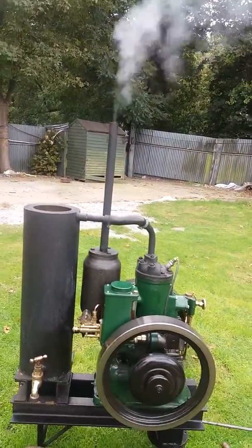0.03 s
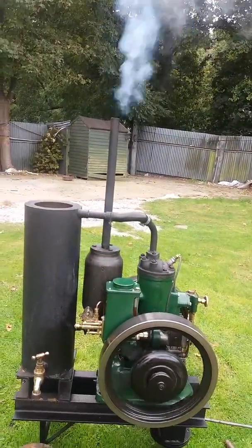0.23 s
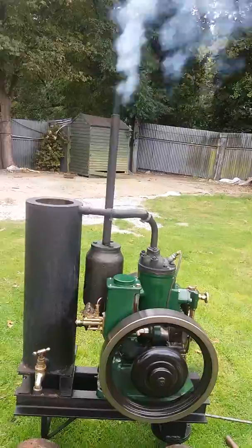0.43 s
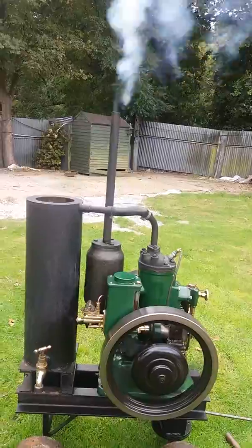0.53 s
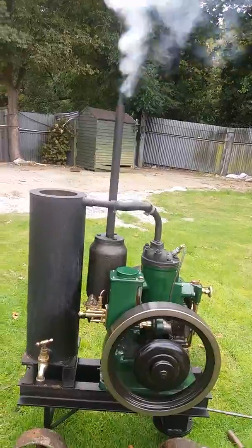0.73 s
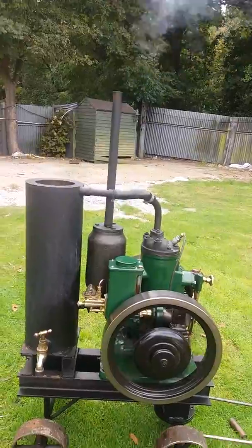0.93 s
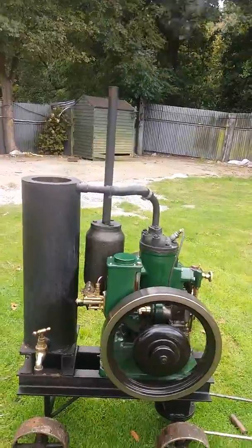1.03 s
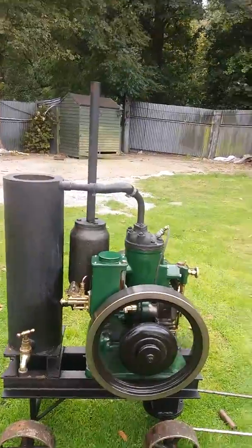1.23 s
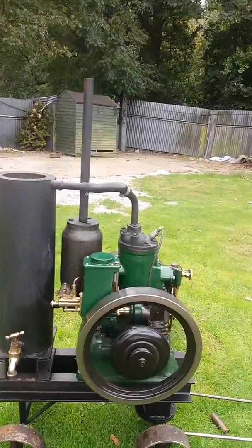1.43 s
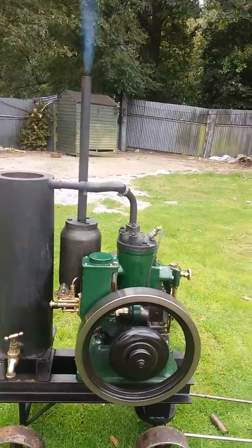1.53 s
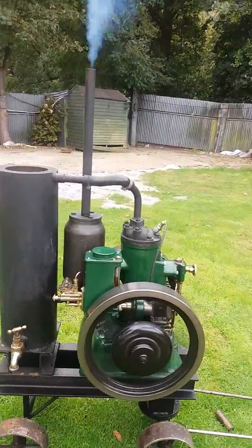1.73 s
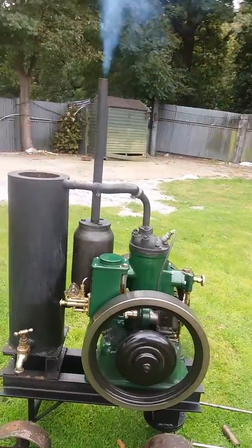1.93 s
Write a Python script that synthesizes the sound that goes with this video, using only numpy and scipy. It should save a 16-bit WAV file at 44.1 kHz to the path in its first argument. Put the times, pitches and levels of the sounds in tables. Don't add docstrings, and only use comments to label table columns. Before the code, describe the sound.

A small vintage stationary engine runs a few metres away outdoors, popping ten times a second with sucking hiss and loose metallic rattle. Exhaust thumps with hissing, whistling puffs come near 0.27 and 0.37 s, then mostly pops and clatter. At 1.0 s a backfire roars and cracks, clipping and fading by 1.2. The phone's level drops; quieter running continues, with firm puffs at 1.2, 1.4 and 1.7-1.9, short diffuse echo, faint low whirr.

```python
import sys
import numpy as np
from scipy import signal
from scipy.fft import rfft, irfft
from scipy.io import wavfile
from scipy.ndimage import uniform_filter1d

SR = 44100
rng = np.random.default_rng(int(sys.argv[2]) if len(sys.argv) > 2 else 0)


def int16_out(signal):
    q = np.round(np.clip(np.atleast_2d(signal).T, -1, 1) * 32767)
    wavfile.write(sys.argv[1], SR, q.astype(np.int16))


def ratio(d):
    e = np.asarray(d, float) / 20
    return 10 ** e


N = 88200
T = np.arange(N) / SR


def unit(x):
    return x / np.sqrt(np.mean(x ** 2))


def coloured(table):
    table_hz, table_db = np.array(table, float).T
    hz = np.arange(1, N // 2 + 2) * SR / N
    db = np.interp(np.log(hz), np.log(table_hz), table_db)
    return unit(irfft(rfft(rng.standard_normal(N)) * ratio(db), N))


def band(x, hz, width_hz):
    return signal.lfilter(*signal.iirpeak(hz, hz / width_hz, fs=SR), x)


def steep_band(x, hz, width_hz):
    return band(band(x, hz, width_hz), hz, width_hz)


def resonant(peaks):
    noise = rng.standard_normal(N)
    return unit(sum(ratio(db) * unit(steep_band(noise, hz, 1.2 * width)) for hz, width, db in peaks))


def clicks(times, dbs):
    x = np.zeros(N)
    where = np.clip((np.asarray(times) * SR).astype(int), 0, N - 1)
    np.add.at(x, where, ratio(np.asarray(dbs)))
    return x


def bursts(times, dbs, rise, hold, t60):
    t = T[:SR // 3]
    shape = np.minimum(t / max(rise, 1e-4), 1) * ratio(-60 * np.maximum(t - rise - hold, 0) / t60)
    power = signal.fftconvolve(clicks(times, dbs) ** 2, shape ** 2)[:N]
    return np.sqrt(np.abs(power))


def flicker(rate_hz, db):
    k = int(SR / rate_hz)
    steps = np.repeat(rng.standard_normal(N // k + 1), k)
    return ratio(db * unit(uniform_filter1d(steps, k)[:N]))


def dip(width_s, rebound):
    wide = np.hanning(int(2.59 * width_s * SR))
    core = np.clip(1 - np.linspace(-2.5, 2.5, len(wide)) ** 2, 0, 1) ** 2
    return core - rebound * wide * core.sum() / wide.sum()


def whistle(hz, width_hz):
    waver = unit(uniform_filter1d(rng.standard_normal(N), SR // 400))
    phase = 2 * np.pi * np.cumsum(hz + width_hz * waver) / SR
    return np.sqrt(2) * flicker(350, 1.55) * np.sin(phase)


# (intake pop t/s, pop level/dB, suction hiss level/dB)
TURNS = [(0.0193, -14, -35), (0.1205, -15, -34.5), (0.2221, -10.5, -35.5), (0.3228, -13.5, -27.5),
         (0.422, -11.5, -29.5), (0.522, -10.5, -29), (0.6229, -13.5, -30.5), (0.7241, -11.5, -30.5),
         (0.8259, -10.5, -30), (0.929, -9, -30.5), (1.0365, -8.0, -7.5), (1.1417, -10, -27),
         (1.2391, -7.5, -26.5), (1.3426, -8.5, -28), (1.4508, -18, -38), (1.5505, -12.5, -33.5),
         (1.6551, -12.5, -33.5), (1.7636, -10.5, -30), (1.8622, -9.5, -32.5), (1.962, -12.5, -31.5)]
# (offset t/s, level/dB, width t/s,
# signed size)
POPS = [
    (0, 2.5, 0.0012, -0.87),
    (.0245, -5.5, 0.0022, 0.66),
    (.0283, -6, 0.0011, -1),
    (.032, 1.5, 0.0044, 0.3),
    (.0555, -10.5, 0.0034, 1),
    (.004, -14, 0.0048, 1),
    (.078, -16, 0.0073, 0.8),
]
# (t/s, level/dB)
VALVE_LIFTS = [(0.0122, -16), (0.1134, -16.5), (0.2147, -17.5), (0.316, -15), (0.4145, -17), (0.514, -16),
               (0.6149, -13.5), (0.7166, -13.5), (0.8182, -14.9), (0.9209, -14), (1.1313, -11),
               (1.2304, -13), (1.334, -13.5), (1.5415, -15), (1.6464, -15.5), (1.7542, -14),
               (1.8534, -14.4), (1.9533, -14)]
# (f/Hz, level/dB)
SUCTION_COLOUR = [(1500, -3), (3000, 1.5), (5500, -1.5), (8000, -5), (12000, -14), (16000, -17)]


def intake():
    t, pop_db, hiss_db = np.array(TURNS).T
    pops = 0
    for offset, gain_db, width, sign in POPS:
        scatter_db = 1.2 * rng.standard_normal(len(t))
        hits = clicks(t + offset, pop_db + gain_db + scatter_db)
        pops = pops + sign * np.convolve(hits, dip(width, 0.83), "same")
    pops = 0.92 * pops + 0.51 * band(pops, 790, 1560)
    lift_s, lift_db = np.array(VALVE_LIFTS).T
    lifts = np.convolve(clicks(lift_s, lift_db + 3), dip(0.0014, 0.6), "same")
    suction = bursts(t - 0.007, hiss_db + 1, rise=0.006, hold=0.0067, t60=0.12)
    return pops - lifts + suction * flicker(300, 2.66) * coloured(SUCTION_COLOUR)


# (f/Hz, level/dB, t60 t/s, delay t/s)
PIPE = [
    (160, 8.5, 0.022, 0.0026),
    (60.3, -8, 0.14, 0.0109),
]


def thump(times, dbs):
    t = T[:SR // 4]
    body = 0
    for hz, db, t60, delay in PIPE:
        since = np.maximum(t - delay, 0)
        body = body + ratio(db - 60 * since / t60) * np.sin(2 * np.pi * hz * since)
    body = np.convolve(body, np.hanning(int(0.0033 * SR)))
    body = body / np.abs(body).max()
    port = np.hanning(int(0.0024 * SR))
    port = np.pad(port, (0, len(body) - len(port)))
    return signal.fftconvolve(clicks(times, dbs), body - ratio(-8.5) * port)[:N]


def gas_puffs(times, first_db, second_db):
    first = bursts(times + 0.001, first_db, rise=0.0031, hold=0.0071, t60=0.042)
    second = bursts(times + 0.022, second_db, rise=0.0068, hold=0.0077, t60=0.07)
    return first + second


# (t/s, thump level/dB, gas level/dB, jet centre f/Hz, second puff level/dB)
FIRINGS = [
    (0.267, -13, -14.5, 4940, -25.5),
    (0.369, -12.5, -15, 5200, -28.5),
    (.980, -25, -19, 5160, -17),
    (1.186, -12.5, -17, 5400, -30),
    (1.393, -9, -10, 5800, -43),
    (1.413, -11.5, -16.5, 5300, -40),
    (1.499, -22, -37, 5400, -45),
    (1.706, -8, -10.5, 5600, -27.5),
    (1.809, -13.5, -18, 5300, -31),
    (1.91, -11, -18, 5750, -34),
]
# (f/Hz, level/dB)
GAS_COLOUR = [(400, -3), (1500, -3.5), (2300, -3.5), (3300, -5), (4500, -3), (7000, -4.5), (10400, -16.5),
              (16000, -26.5)]
# (t/s, f/Hz, level/dB, width/Hz)
SHEEN = [(0.27, 10470, -23, 1600), (.271, 6230, -23, 400), (0.371, 11100, -33, 2000),
         (.519, 4770, -28.5, 249.8), (0.583, 5470, -30, 200), (.684, 5430, -27.5, 200),
         (.785, 5400, -32, 200), (1.302, 5330, -28, 300), (1.187, 6280, -26.5, 500),
         (1.395, 6700, -22, 598.5), (1.705, 6800, -19.5, 500), (1.815, 5400, -19, 500),
         (1.912, 5480, -20, 500)]
# (t/s, f/Hz, level/dB, width/Hz, hold t/s)
WHISTLES = [(.266, 760, -24, 60.1, 0.0032), (0.269, 1950, -36, 40.6, 0.0077),
            (0.285, 1860, -27.5, 25, 0.018), (0.312, 1850, -38, 25, .02), (0.371, 1090, -21.5, 55, 0.006),
            (.376, 1840, -31, 40.4, 0.0041), (0.392, 1060, -28.5, 59, 0.011),
            (0.386, 1880, -30.5, 30, 0.01), (0.98, 850, -28.5, 79.3, 0.0048),
            (1.029, 310, -13.5, 71, 0.0091), (1.02, 1260, -15, 83.5, 0.0062),
            (1.064, 720, -21.5, 61, 0.017), (1.184, 1280, -17.5, 58.8, 0.0033),
            (1.193, 1450, -18, 60.4, 0.0062), (1.19, 2450, -20.5, 147.5, 0.0054),
            (1.206, 1164, -21.5, 81, 0.01), (1.394, 2450, -18.5, 198.7, 0.0092),
            (1.39, 1080, -20.5, 60, .009), (1.411, 1220, -21, 99.5, 0.011),
            (1.706, 1070, -17, 25.2, 0.0069), (1.734, 1050, -26.5, 30, 0.0038),
            (1.807, 1080, -20, 39.3, 0.0064), (1.826, 1040, -32, 30, 0.013),
            (1.908, 1130, -16.5, 30, 0.0037), (1.911, 2270, -25.5, 49.6, 0.0096),
            (1.929, 1050, -30, 40.5, .012), (1.933, 1910, -28, 45, 0.01)]


def exhaust():
    t, thump_db, gas_db, jet_hz, second_db = np.array(FIRINGS).T
    out = thump(t, thump_db)
    rough = flicker(500, 1.6)
    out = out + ratio(-3.0) * gas_puffs(t, gas_db, second_db) * rough * coloured(GAS_COLOUR)
    for k, hz in enumerate(jet_hz):
        one = slice(k, k + 1)
        puffs = gas_puffs(t[one], gas_db[one], second_db[one])
        out = out + ratio(-3.0) * puffs * rough * resonant([(hz, 1040, 0)])
    for s, hz, db, width in SHEEN:
        edge = bursts([s], [db], rise=0.002, hold=0.0065, t60=0.04)
        out = out + edge * resonant([(hz, width, 0)])
    for s, hz, db, width, hold in WHISTLES:
        out = out + bursts([s], [db], 0.003, hold, t60=0.041) * whistle(hz, width)
    return out


# (t/s, level/dB)
FLAME = [
    (.995, -35),
    (.996, -12),
    (1.008, -7),
    (1.015, -7),
    (1.019, -6.5),
    (1.045, -10.5),
    (1.09, -8),
    (1.13, -17),
    (1.19, -29.5),
]
# (f/Hz, level/dB)
FLAME_COLOUR = [(100, -4.5), (400, -5.5), (700, -11.5), (1150, -6.5), (3000, -3.5), (5770, 0.5),
                (9000, -13), (16000, -32)]
# (f/Hz, level/dB)
CRACK_COLOUR = [(180, -23), (650, 0), (2500, -6.5), (5000, -0.5), (16000, -13)]
# (f/Hz, level/dB, t60 t/s)
SHELL = [
    (171, -4.5, 0.038),
    (630, 0.5, 0.023),
    (1764, -4, 0.023),
]


def backfire():
    flame_s, flame_db = np.array(FLAME).T
    burning = (T > flame_s[0]) * (T < flame_s[-1])
    roar = ratio(np.interp(T, flame_s, flame_db)) * burning * flicker(300, 2.1) * coloured(FLAME_COLOUR)
    crack = bursts([1.008], [-6.5], rise=0.0029, hold=0.0024, t60=0.035) * coloured(CRACK_COLOUR)
    t = np.maximum(T - 1.0085, 0)
    shell = sum(ratio(db - 60 * t / t60) * np.sin(2 * np.pi * hz * t) for hz, db, t60 in SHELL)
    return roar + crack + shell * np.minimum(t / 0.0021, 1)


# (t/s, level/dB, share of the low casting ring level/dB)
RATTLES = [(0, -24, -8),
           (0.025, -24.5, -5), (0.044, -39, -4), (0.062, -24.5, -3), (0.069, -29, -6),
                 (0.077, -33.5, -11), (0.099, -53, 5), (0.125, -24.5, -5.5), (0.147, -30, -11),
                 (0.166, -24.5, -2), (0.187, -23.5, -4), (0.191, -29.5, -2), (0.199, -30, 1),
                 (0.209, -45, 14), (0.226, -26, -20), (0.246, -26, -10.5), (0.299, -32, 1),
                 (0.33, -36, -10), (0.35, -27.5, -8), (0.403, -35, 10), (0.43, -28.5, -7),
                 (0.451, -24.5, -15), (0.47, -25.5, -8), (0.489, -27, -1), (0.503, -28.5, 3),
                 (0.522, -35, 7), (0.549, -27, -2), (0.574, -26.5, -7), (0.584, -23.5, -8),
           (0.621, -34, 2), (0.634, -25, -9), (0.653, -37, 0), (0.672, -25.5, 1), (0.679, -28, -2),
                  (0.685, -24, -17), (0.732, -27, -22), (0.753, -30.5, -2), (0.771, -33, -1),
                  (0.781, -31, -5), (0.787, -24.5, -4), (0.824, -35, -9), (0.832, -28.5, -3),
                  (0.839, -33, 2), (0.857, -28, 2.5), (0.878, -23.5, -9), (0.895, -26.5, -3.5),
                  (0.926, -30, 2), (0.937, -26.5, -10), (0.956, -34, -5), (1.237, -30, 3),
                  (1.269, -25.5, 3.5), (1.289, -26.5, 2.5), (1.297, -27, 3),
           (1.305, -24.5, -4), (1.324, -30.5, 3), (1.346, -22.5, -6), (1.374, -28, -2),
                (1.454, -30, -9), (1.495, -26, -8), (1.513, -30, -10), (1.556, -25, -5), (1.584, -27, -9),
                (1.603, -26, -14), (1.623, -28, -8), (1.635, -27, -7), (1.667, -24.5, -12),
                (1.688, -49, -16), (1.736, -23.5, -13), (1.764, -31, -5), (1.789, -24.5, -7),
                (1.846, -31, 3), (1.862, -27.5, 1), (1.891, -29, -3), (1.968, -28, -20), (1.99, -27, -2)]
# (f/Hz, width/Hz, level/dB)
CASTING_LOW = [(1122, 114, 0.5), (1320, 180, -3)]
# (f/Hz, width/Hz, level/dB)
CASTING_HIGH = [(2525, 710, -7), (2994, 840, -2.5), (4330, 3550, -12), (5300, 820, -1), (5800, 1140, -10.5)]


def linkage():
    t, db, low_db = np.array(RATTLES).T
    chatter = bursts(t, db, rise=0.0002, hold=0.0045, t60=0.018)
    chatter = chatter * flicker(900, 2.65) * rng.standard_normal(N)
    struck = chatter + 6 * clicks(t + 0.0005, db + 4)
    high = 0
    for k, (hz, width, gain_db) in enumerate(CASTING_HIGH):
        ring = steep_band(struck, hz, 1.31 * width) * np.sqrt(SR / width / 6)
        high = high + (-1) ** k * ratio(gain_db) * ring
    low = bursts(t, db + low_db - 1.5, rise=0.0015, hold=0.0015, t60=0.07) * resonant(CASTING_LOW)
    return high + low


def fence_echo(engine):
    t = T[:SR // 2]
    tail = rng.standard_normal(len(t)) * ratio(-60 * t / 0.3) * np.minimum(t / 0.006, 1)
    reply = band(tail, 2660, 5600) / np.sqrt(np.sum(tail ** 2))
    return ratio(-11.5) * signal.fftconvolve(engine, reply)[:N]


# (f/Hz, level/dB)
GARDEN_COLOUR = [(24, -39), (40, 2), (130, -2), (918, -4.5), (1090, 1), (1900, -8.5), (5580, -19),
                 (7540, -30), (16000, -50)]


def garden():
    return ratio(-32.5) * flicker(60, 1.5) * coloured(GARDEN_COLOUR)


def scene():
    engine = intake() + exhaust() + backfire() + linkage()
    heard = engine + fence_echo(engine) + garden()
    heard = heard - 0.43 * band(heard, 250, 48)
    return heard[None]


def roll_off(x):
    return signal.sosfilt(signal.butter(12, 15900, fs=SR, output="sos"), x)


def record(dry):
    duck_db = np.interp(T, [1.0, 1.037], [0, -11.5])
    low_cut = signal.butter(4, 53.5, "high", fs=SR, output="sos")
    mix = signal.sosfilt(low_cut, dry * ratio(duck_db))
    return roll_off(np.clip(mix, -1, 1))


dry = scene()
out = record(dry)
int16_out(out)
```